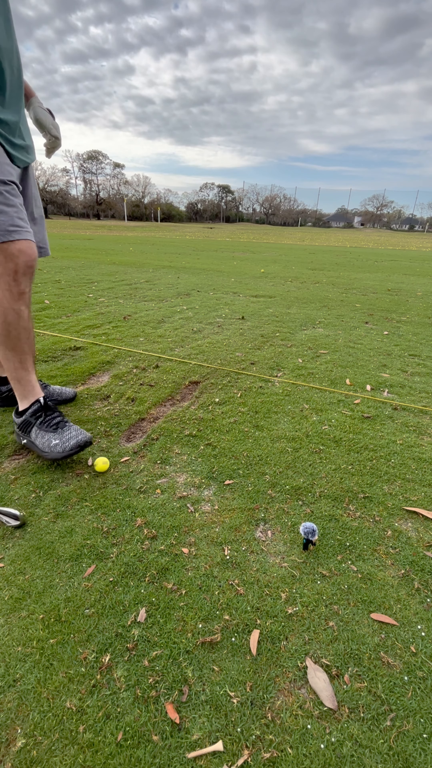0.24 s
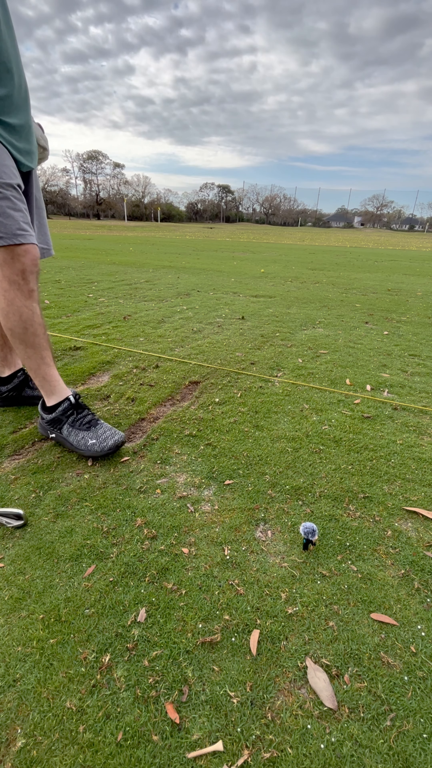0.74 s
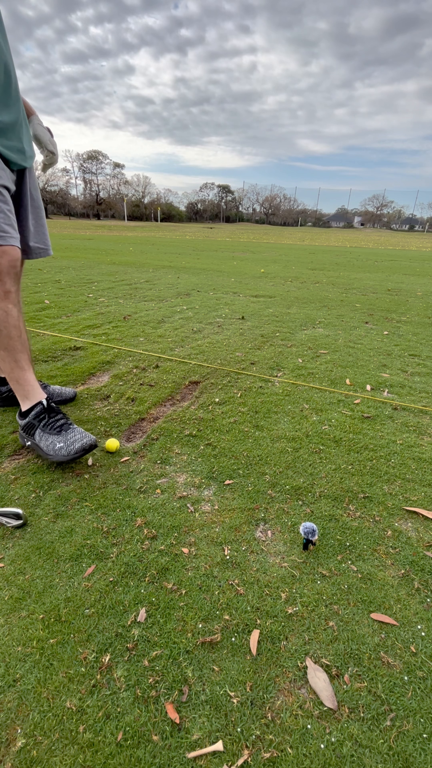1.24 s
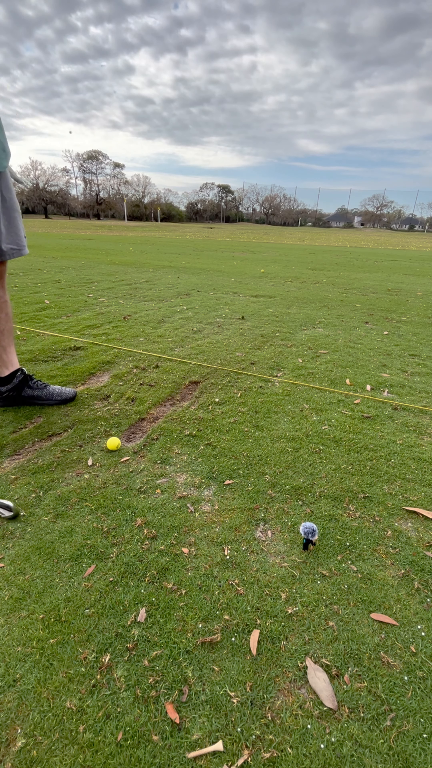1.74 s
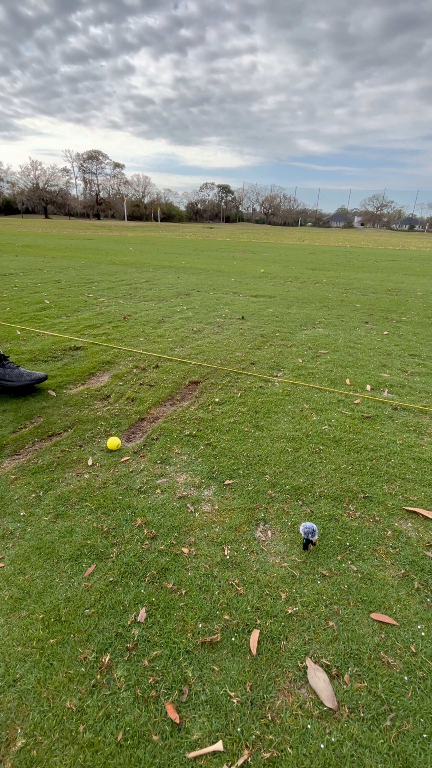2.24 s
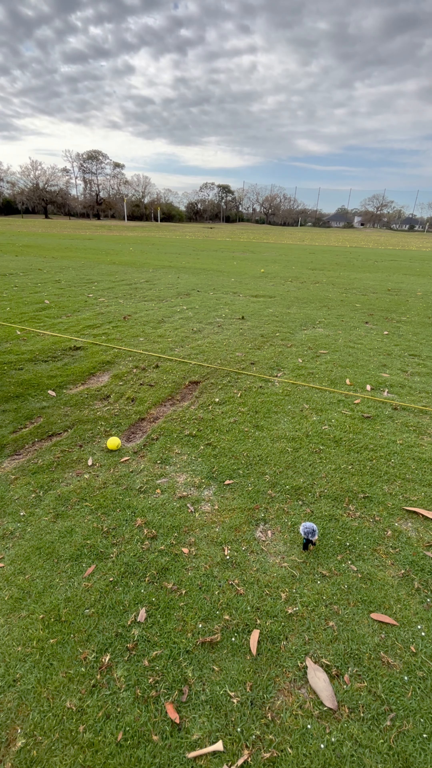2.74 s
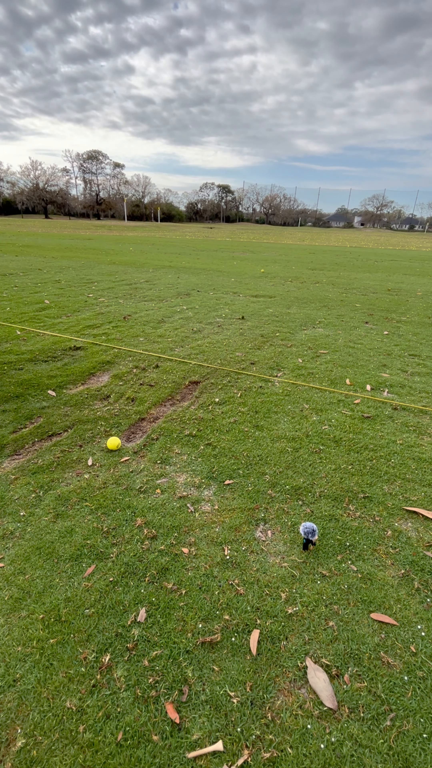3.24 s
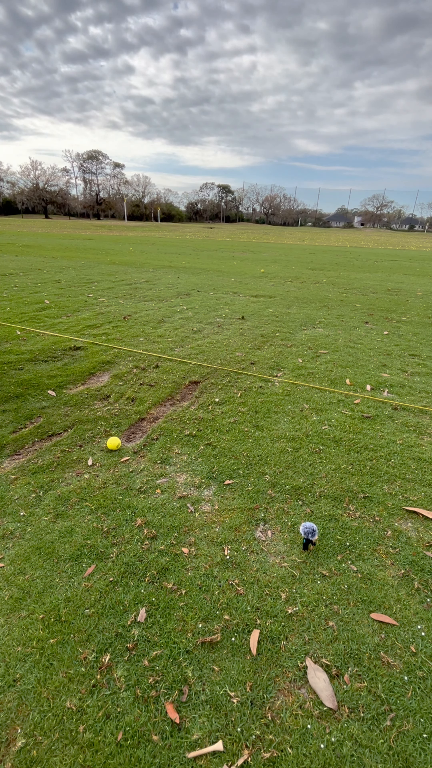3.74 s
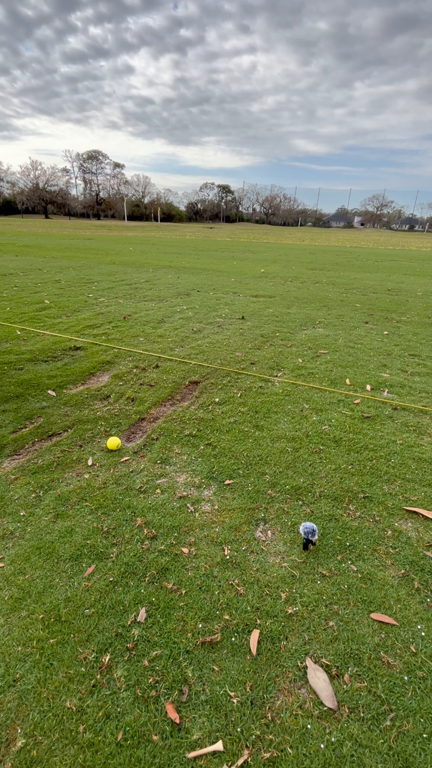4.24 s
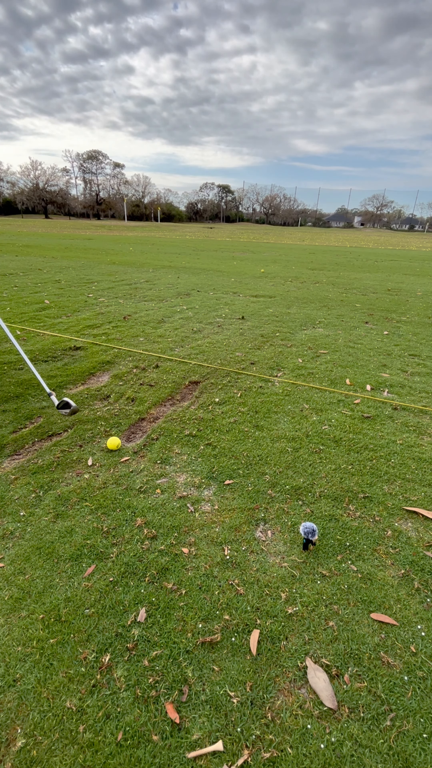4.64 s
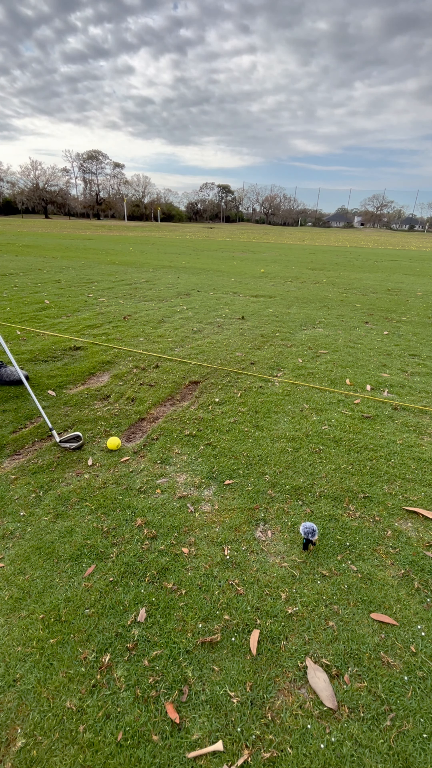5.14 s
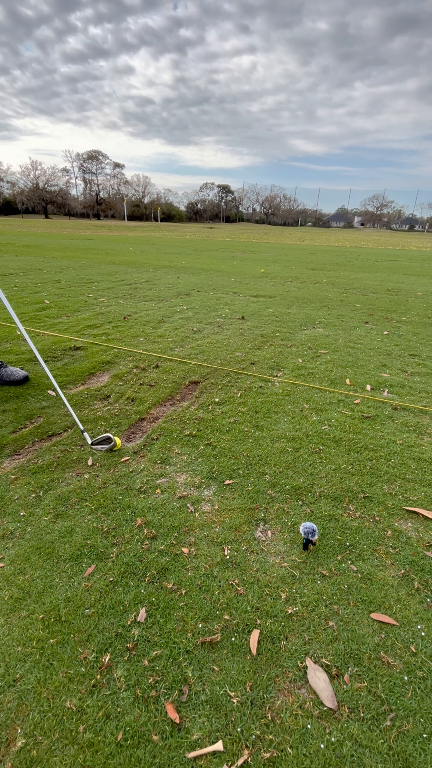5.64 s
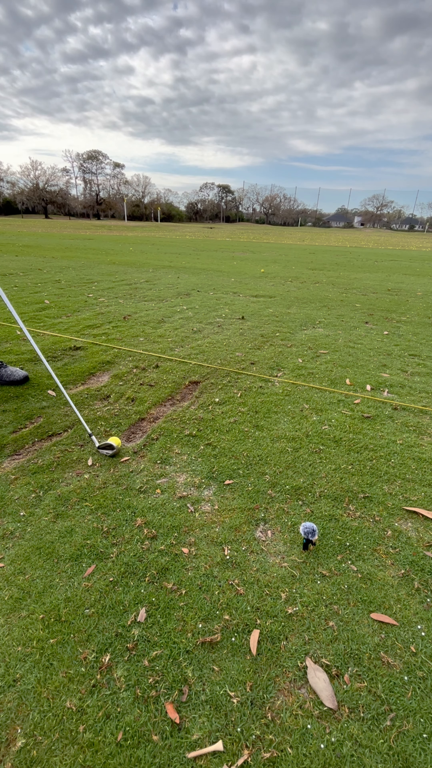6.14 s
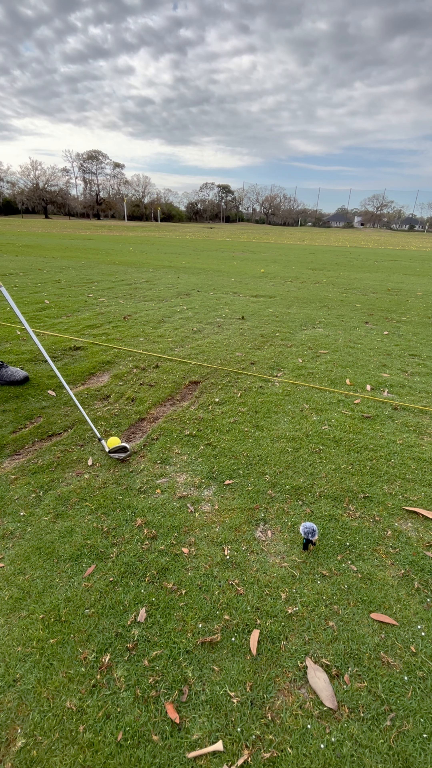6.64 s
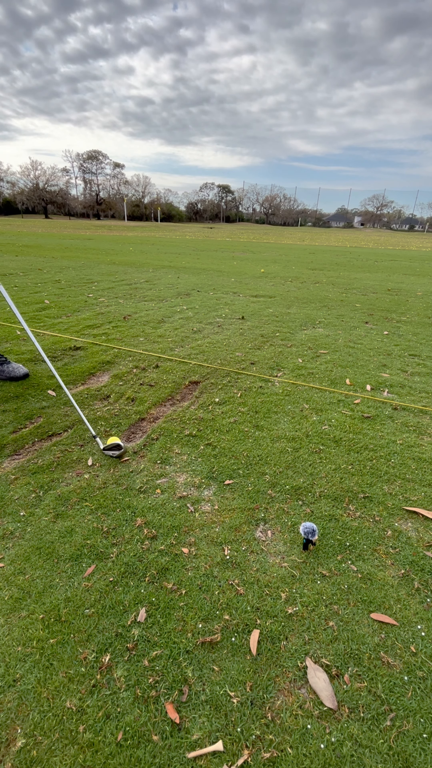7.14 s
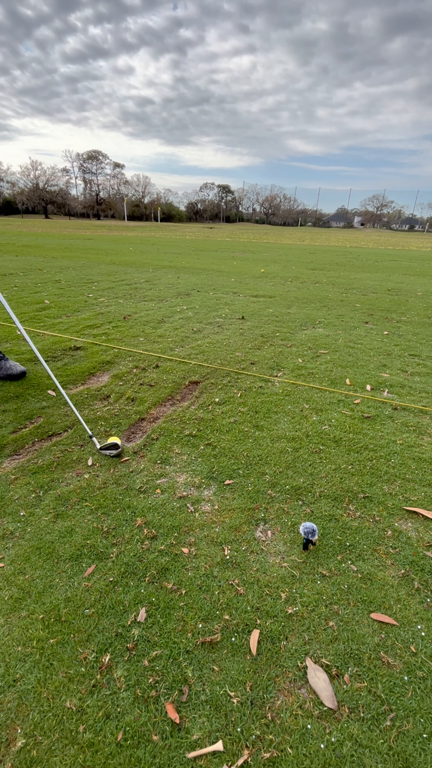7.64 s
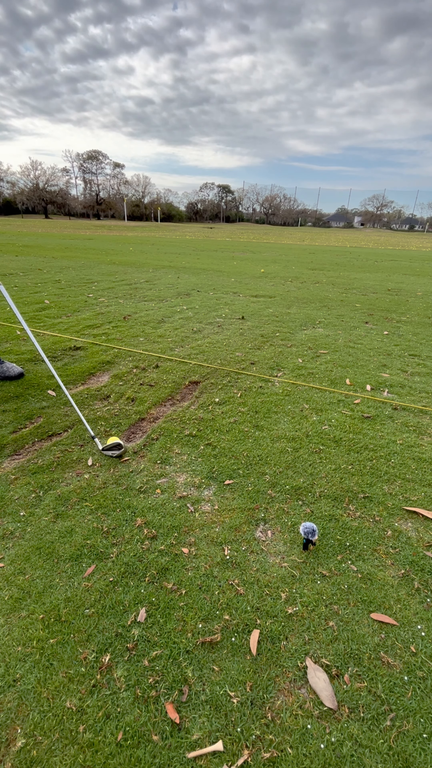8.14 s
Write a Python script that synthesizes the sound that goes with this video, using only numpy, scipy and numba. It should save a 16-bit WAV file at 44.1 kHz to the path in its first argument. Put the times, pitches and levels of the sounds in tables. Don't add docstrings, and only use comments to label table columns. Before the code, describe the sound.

An open grass field under faint road rumble and hiss. Hoarse crows call from far trees almost continuously. At about 1.7 seconds an iron hits a ball with one loud, dry, very short metallic crack, followed by a tiny turf clip and slight scattered echo. The crows carry on, with a few dull distant thuds, a falling jay whistle near 7.4 seconds and a faint brake squeal at the end. The microphone is close to the strike.

```python
import sys
import numpy as np
from scipy import signal
from scipy.io import wavfile
from scipy.ndimage import uniform_filter1d
from numba import njit

SR = 44100
rng = np.random.default_rng(int(sys.argv[2]) if len(sys.argv) > 2 else 0)


def inscribe(sig):
    pcm = np.round(np.clip(np.atleast_2d(sig).T, -1, 1) * 32767)
    wavfile.write(sys.argv[1], SR, pcm.astype(np.int16))


def ratio(d):
    e = np.asarray(d, float) / 20
    return 10 ** e


N = 369558
T = np.arange(N) / SR


def strike():
    # (frequency [Hz], level [dB], t60 before decay_scale [s])
    head_modes = [(490, -9.5, 0.029), (894, -17.5, 0.035), (1410, -4, 0.036), (1750, -2.5, 0.031),
                  (2910, -18.5, 0.023), (3381, -22.5, 0.034), (4320, 1.5, 0.019), (5690, -37.5, 0.082),
                  (6607, -2, 0.018), (7155, -16.5, 0.032), (8570, 2, 0.018)]
    # (time [s], push level [dB], push length [s], scrape level [dB], scrape peak delay [s])
    blows = [
        (1.7355, -20.5, 0.0009, -31, 0.004),
        (1.756, -53, 0.00072, -61, 0.0022),
    ]
    start_s, decay_scale = 1.73, 0.54
    t, force = T[:SR // 8], 0
    for s, push_db, push_s, scrape_db, scrape_s in blows:
        u = np.maximum(t + start_s - s, 0)
        push = np.sin(np.pi * np.minimum(u / push_s, 1)) ** 4
        grit = rng.standard_normal(len(t)) * (u / scrape_s) ** 2 * np.exp(2 - 2 * u / scrape_s)
        force = force + ratio(push_db) * push + ratio(scrape_db) * grit
    ring = 0
    for k, (hz, db, t60_s) in enumerate(head_modes):
        decay = np.exp(-np.log(1000) * t / (decay_scale * t60_s))
        ring = ring + (-1) ** k * ratio(db) * np.sin(2 * np.pi * hz * t) * decay
    crack = np.convolve(force, ring)[:len(t)]
    crack = steep(crack, 9000, "low", order=4)
    crack = steep(crack, 415, "high", order=2)
    return ratio(-13) * np.pad(crack, (int(start_s * SR), N))[:N]


def puffs():
    # (time [s], level [dB], centre [Hz], width [Hz], time constant [s])
    rushes = [
        (1.740, -38.5, 495, 130, .02),
        (.573, -75, 1650, 94, .023),
        (8.2, -82.5, 2090, 220, .065),
    ]
    # (time [s], level [dB], centre [Hz], width [Hz], time constant [s])
    echoes = [
        (1.745, -47, 220, 150, .04),
        (1.75, -62, 7900, 5000, .033),
        (1.835, -56.5, 3800, 1200, .03),
        (1.83, -66.5, 7100, 3300, .036),
        (.476, -63.5, 540, 630, .0099),
        (8.378, -69, 5200, 23000, .01),
    ]
    lead_s = .2
    out = np.zeros(N + SR)
    for rows, rise_share in (rushes, 1), (echoes, .15):
        for s, db, hz, width_hz, fall_s in rows:
            t = T[:SR // 2] - lead_s
            at = int((s - lead_s) * SR)
            air = unit(resonate(rng.standard_normal(len(t)), [(hz, width_hz, 0)]))
            envelope = np.exp(np.minimum(t / (rise_share * fall_s), -t / fall_s))
            out[at:at + len(t)] += ratio(db) * air * envelope
    return out[:N]


def crows():
    # (full voice from [s], held [s], start pitch [Hz], end pitch [Hz], level [dB])
    near_caws = [(1.124, .05, 354, 319, -58), (1.79, .04, 352, 300, -54), (1.9, .053, 359, 314, -56),
                 (2.142, .025, 291, 260, -45), (2.225, .135, 250, 245, -48), (3.138, .022, 304, 255, -44),
                 (3.225, .125, 240, 235, -50), (5.114, .09, 340, 264, -65), (6.785, .07, 300, 242, -44),
                 (7.125, .051, 354, 290, -60), (7.222, .025, 299, 370, -49), (7.295, .035, 380, 294, -46),
                 (7.72, .06, 357, 329, -68)]
    second_caws = [(.096, .06, 340, 300, -82), (.548, .022, 340, 310, -77), (1.558, .09, 360, 296, -59),
                   (2.58, .105, 358, 311, -54), (2.945, .105, 360, 324, -57), (3.37, .05, 360, 292, -52),
                   (3.64, .09, 335, 272, -62), (3.965, .09, 337, 284, -61), (4.235, .11, 344, 300, -57),
                   (4.73, .075, 345, 303, -55), (5.298, .066, 331, 286, -55), (5.54, .07, 342, 297, -59),
                   (5.79, .11, 330, 273, -57), (6.312, .09, 331, 282, -56), (6.5, .055, 342, 287, -57),
                   (7.42, .08, 323, 277, -59), (7.985, .095, 316, 276, -59)]
    third_caws = [(.321, .02, 340, 310, -76), (.636, .055, 340, 300, -81), (2.68, .06, 368, 298, -61),
                  (3.73, .09, 355, 313, -53), (4.36, .075, 332, 278, -59), (4.82, .05, 343, 287, -59),
                  (5.39, .05, 341, 293, -55), (5.925, .085, 358, 287, -55), (6.36, .08, 361, 314, -55),
                  (6.9, .055, 326, 274, -56), (7.79, .05, 397, 343, -61), (8.341, .05, 321, 300, -66)]
    # (time [s], held [s], beak level [dB], top level [dB])
    rasps = [(.123, .09, -95, -88), (.287, .12, -94, -89), (.653, .046, -89, -88), (1.135, .032, -86, -95),
             (1.589, .06, -67, -73), (1.84, .116, -69, -69), (1.973, .02, -72, -78),
             (2.273, .097, -71, -70), (2.636, .09, -67, -66), (3.014, .05, -70, -69),
             (3.12, .071, -73, -90), (3.234, .067, -72, -75), (3.344, .097, -70, -73),
             (3.718, .141, -72, -73), (3.793, .068, -67, -71), (4.028, .041, -89, -88),
             (4.323, .047, -74, -79), (4.392, .07, -77, -78), (4.788, .097, -70, -68),
             (5.378, .076, -69, -73), (5.935, .083, -69, -68), (6.39, .037, -77, -81),
             (6.488, .093, -68, -74), (6.81, .079, -70, -86), (6.88, .09, -75, -78),
             (7.152, .096, -74, -81), (7.212, .15, -72, -80), (7.434, .15, -83, -73),
             (7.722, .09, -65, -69), (8.021, .062, -67, -71)]
    # (centre [Hz], width [Hz], level [dB])
    throat_modes = [(1314, 340, -1.5), (1514.5, 303, 5), (1784, 395, -6.5)]
    beak_modes = [(4350, 390, -1.5)]
    top_modes = [(5600, 940, -2.5), (6500, 1300, -3.5), (7150, 600, -2)]
    # (caws, voice over breath [dB], pitch arch share)
    flock = [(near_caws, 2, .06), (second_caws, -5, .04), (third_caws, -5, .035)]
    lead_s, lag_s = .03, .04
    jitter, patchy_db, partials, knots = .006, 2, 26, 6
    throat_hoarse_db, beak_hoarse_db = -6.5, 3
    shut_hz, gape_hz, gape_s = 4350, 4850, .16

    pulses = np.zeros(N + SR)
    wobble = 1 + jitter * np.pad(walk(90), (0, SR))
    gains = []
    for caws, clear_db, arch in flock:
        for s, hold_s, start_hz, end_hz, db in caws:
            u = np.arange(0, 1, 1 / ((lead_s + hold_s + lag_s) * SR))
            first = int((s - lead_s) * SR)
            at = slice(first, first + len(u))
            hz = (start_hz + (end_hz - start_hz) * u) * (1 + 4 * arch * u * (1 - u))
            phase = 2 * np.pi * np.cumsum(hz * wobble[at]) / SR
            patchy = ratio(patchy_db * rng.standard_normal((partials, knots)))
            train = 0
            for k, gain in enumerate(patchy, 1):
                train = train + np.interp(u, np.linspace(0, 1, knots), gain) * np.cos(k * phase)
            pulses[at] += ratio(db + clear_db) * np.sin(np.pi * u) ** 0.3 * train / 4.5
            gains.append(swell(s, hold_s, db, rise_db_s=460, fall_db_s=275, grow_db=5.5))
    loud = together(gains)
    pulses = trees(pulses[:N]) / (loud + ratio(-80))
    throat = even(resonate(pulses + ratio(throat_hoarse_db) * noise(), throat_modes))
    breath = pulses + ratio(beak_hoarse_db) * noise()

    beak = [swell(s, hold_s, db, 205, 290) for s, hold_s, db, _ in rasps]
    top = [swell(s, hold_s, db, 205, 290) for s, hold_s, _, db in rasps]
    opened = 0
    for gain, (s, hold_s, _, _) in zip(beak, rasps):
        opened = opened + gain ** 2 * np.clip(.5 + (T - s - hold_s / 2) / gape_s, 0, 1)
    beak_gain = together(beak)
    beak_hz = shut_hz + (gape_hz - shut_hz) * np.clip(opened / beak_gain ** 2, 0, 1)
    moving = glide(glide(breath, beak_hz, 510.0), beak_hz, 950.0)
    rasp = even(moving + resonate(breath, beak_modes))
    rasp = steep(rasp, 4000, "high", order=8)
    bright = even(resonate(breath, top_modes))
    return dull(throat, 1965) * loud + rasp * beak_gain + bright * together(top)


def jay():
    # (time [s], held [s], 2nd harmonic start [Hz], end [Hz], level [dB])
    whistles = [
        (1.47, .14, 2790, 2715, -81),
        (3.25, .11, 2770, 2750, -74),
        (7.405, .29, 3790, 3400, -57),
    ]
    # (time [s], held [s], level [dB])
    scold_calls = [(0.0, .04, -73), (.14, .2, -79), (2.19, .17, -79), (2.48, .2, -84), (4.69, .16, -76),
                   (4.95, .3, -79), (7.69, .1, -66)]
    # (multiple, level [dB], throat favours [Hz])
    far_overtones = [(3, -6, 4150)]
    near_overtones = [(3, -19.5, 5600), (4, -21, 7000), (5, -23, 8800)]
    far = 0
    for row in whistles[:-1]:
        far = far + tone(row, far_overtones, 2, flutter_db=4.5, rise_db_s=150, fall_db_s=190)
    near = tone(whistles[-1], near_overtones, 2, flutter_db=4.5, rise_db_s=900, fall_db_s=500)
    scold_gain = together([swell(*row, rise_db_s=250, fall_db_s=220) for row in scold_calls])
    hoarse = resonate(noise() * ratio(1.4 * walk(60)), [(3370, 630, 0), (2780, 246, -16)])
    return trees(far + near, -1.5, .15) + scold_gain * unit(hoarse)


def knocks():
    # (time [s], level [dB], frequency [Hz], t60 [s])
    far_knocks = [
        (.475, -54, 500, .1),
        (2.379, -57, 490, 0.17),
        (3.53, -51, 490, 0.23),
        (3.769, -46, 100, 0.14),
        (4.919, -37, 197, 0.086),
    ]
    out = 0
    for s, db, hz, t60_s in far_knocks:
        t = np.maximum(T - s, 0)
        envelope = (1 - np.exp(-t / 0.0063)) * np.exp(-np.log(1000) * t / t60_s)
        out = out + ratio(db) * np.sin(2 * np.pi * hz * t) * envelope
    return out


def road():
    # (frequency [Hz], density [dB per Hz])
    spectrum = [(8.8, -30), (15, 1), (68, -5), (128, -17.5), (217, -22), (281, -33.5), (517, -31.5),
                (898, -37), (1270, -57), (1560, -66), (1850, -71.5), (2140, -75), (4180, -63.5),
                (10600, -53.5), (15400, -65)]
    # (time [s], rumble level [dB])
    traffic = [(0.0, -54), (0.61, -55), (0.63, -48), (1.03, -53), (2.66, -52), (3.13, -58), (3.2, -45),
               (3.34, -42), (3.36, -54), (3.71, -53), (3.76, -43), (3.97, -58), (4.22, -46), (4.27, -52),
               (5.2, -53), (5.25, -46), (5.37, -54), (8.38, -53)]
    # (time [s], held [s], start [Hz], end [Hz], level [dB])
    squeals = [
        (7.86, .04, 659, 660, -70),
        (7.95, .5, 663, 670, -75),
    ]
    low, high, drift = 0, 0, walk(0.44)
    spectrum_hz, spectrum_db = np.transpose(spectrum)
    for hz in 20 * 2 ** np.arange(0, 10, 1 / 2):
        db = np.interp(np.log(hz), np.log(spectrum_hz), spectrum_db)
        db = db + (0.8 * drift + 1.9 * walk(5.3)) * (hz < 3000)
        band = ratio(db) * svf(svf(noise(), hz, hz / 1.96), hz, hz / 1.82)
        if hz < 105:
            low = low + band
        else:
            high = high + band
    passing = heard(traffic)
    rumble = unit(low) * passing
    drone = unit(svf(noise(), 130., 15.0)) * ratio(-63 + 2.5 * walk(4)) * unit(passing ** .4)
    brakes = 0
    for row in squeals:
        brakes = brakes + tone(row, [], 1, flutter_db=3.0, rise_db_s=300, fall_db_s=400)
    return rumble + drone + unit(high) * ratio(-63.5) + brakes


def whine():
    # (frequency [Hz], level [dB])
    lines = [(4000, -99), (4802, -102), (6202, -105), (7197, -96), (7402, -100), (7601, -99), (7800, -94),
             (8000, -87), (8199, -104), (9598, -94), (10401, -88), (10600, -101), (11999, -96)]
    out = 0
    for hz, db in lines:
        out = out + np.sqrt(2) * ratio(db + 0.5 * walk(3)) * np.sin(2 * np.pi * hz * T)
    return out


def tone(row, overtones, base, flutter_db, rise_db_s, fall_db_s):
    s, hold_s, start_hz, end_hz, db = row
    hz = np.interp(T, [s, s + hold_s], [start_hz, end_hz]) * (1 + 0.0035 * walk(90))
    phase = 2 * np.pi * np.cumsum(hz) / SR
    stack = np.sin(phase)
    for k, k_db, best_hz in overtones:
        off = (k * hz / base - best_hz) / 380
        stack += ratio(k_db - 10 * off ** 2) * np.sin(k * phase / base)
    gain = swell(s, hold_s, db, rise_db_s, fall_db_s) * ratio(flutter_db * walk(40))
    return np.sqrt(2) * gain * stack


def trees(x, wet_db=-5, t60_s=.2):
    t = T[:SR // 3]
    tail = rng.standard_normal(len(t)) * np.exp(-np.log(1000) * t / t60_s)
    return x + ratio(wet_db) * signal.fftconvolve(x, tail / np.linalg.norm(tail))[:N]


def dull(x, hz):
    return steep(steep(x, hz, "low", order=10), 1230, "high", order=4)


def steep(x, hz, kind, order):
    return signal.sosfilt(signal.butter(order, hz, kind, fs=SR, output="sos"), x)


def resonate(x, modes):
    out = 0
    for k, (hz, width_hz, db) in enumerate(modes):
        once = svf(x, 1. * hz, 1. * width_hz)
        out = out + (-1) ** k * ratio(db) * svf(once, 1. * hz, 0.71 * width_hz)
    return out


@njit
def svf(x, hz, width):
    y, b, l = np.empty(len(x)), 0., 0.
    g, k = np.tan(np.pi * hz / SR), width / hz
    for i in range(len(x)):
        v = (b + g * (x[i] - l)) / (1 + g * (g + k))
        b, l, y[i] = 2 * v - b, l + 2 * g * v, k * v
    return y


@njit
def glide(x, hz, width):
    y, b, l = np.empty(len(x)), 0., 0.
    for i in range(len(x)):
        g, k = np.tan(np.pi * hz[i] / SR), width / hz[i]
        v = (b + g * (x[i] - l)) / (1 + g * (g + k))
        b, l, y[i] = 2 * v - b, l + 2 * g * v, k * v
    return y


def swell(s, hold_s, db, rise_db_s, fall_db_s, grow_db=0):
    t = T - s
    rise = rise_db_s * np.maximum(-t, 0)
    fall = fall_db_s * np.maximum(t - hold_s, 0)
    return ratio(db - rise - fall + grow_db * (np.clip(t / hold_s, 0, 1) - .5))


def together(gains):
    return uniform_filter1d(np.sqrt(sum(g ** 2 for g in gains)), size=300) + 1e-9


def heard(table):
    return ratio(np.interp(T, *np.transpose(table)))


def walk(rate_hz):
    k = int(SR / rate_hz)
    held = np.repeat(rng.standard_normal(N // k + 1), k)
    return 1.3 * uniform_filter1d(uniform_filter1d(held, k), k)[:N]


def even(x):
    return x / np.sqrt(uniform_filter1d(x ** 2, size=2600))


def unit(x):
    return x / np.sqrt(np.mean(x ** 2))


def noise():
    return rng.standard_normal(N)


def scene():
    return (strike() + puffs() + crows() + jay() + knocks() + road())[None]


def band_limit(x):
    return signal.sosfilt(signal.butter(12, 15580, fs=SR, output="sos"), x)


def record(dry):
    mix = dry + whine()
    return band_limit(mix)


dry = scene()
out = record(dry)
inscribe(out)
```